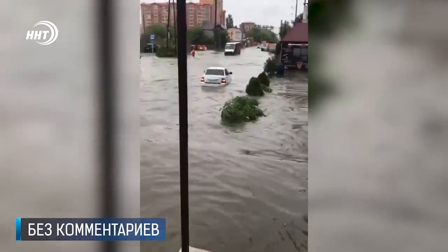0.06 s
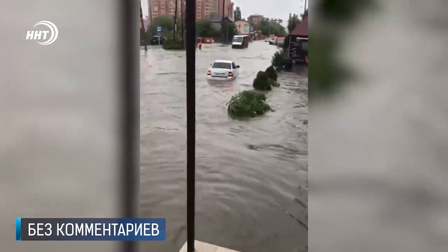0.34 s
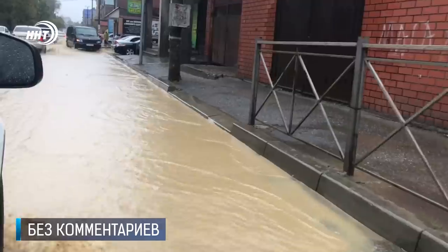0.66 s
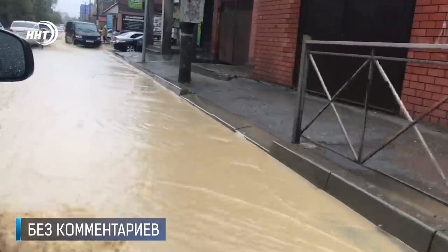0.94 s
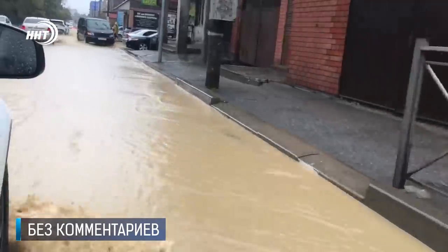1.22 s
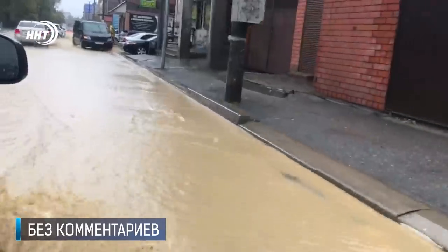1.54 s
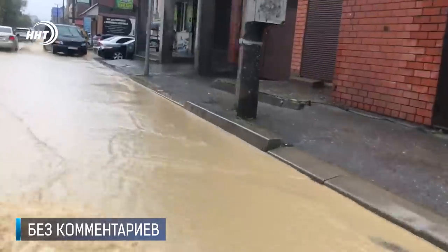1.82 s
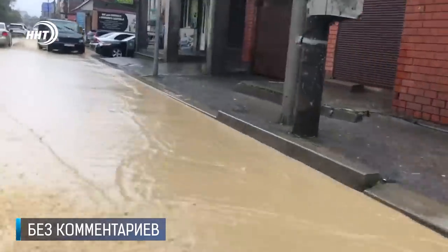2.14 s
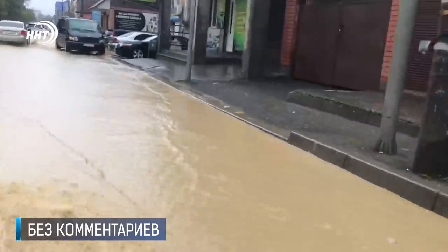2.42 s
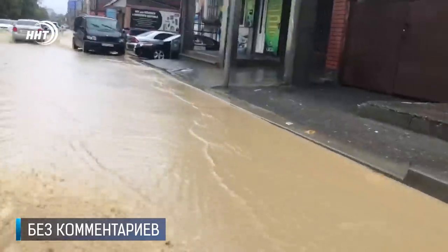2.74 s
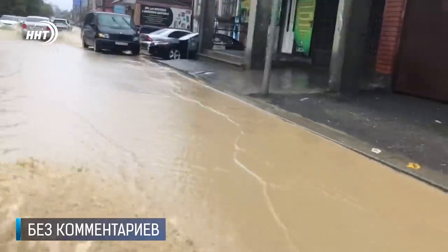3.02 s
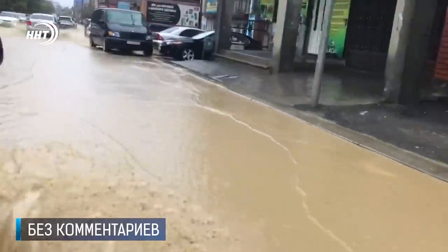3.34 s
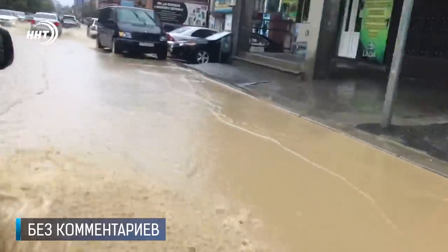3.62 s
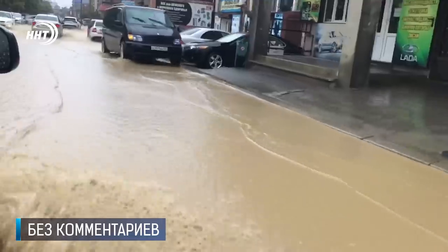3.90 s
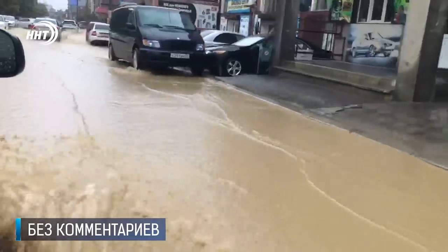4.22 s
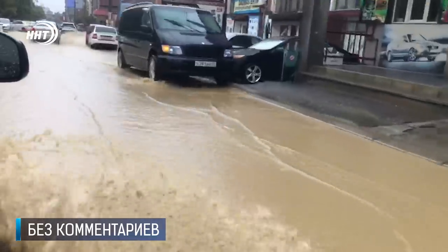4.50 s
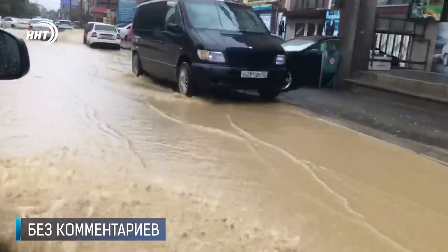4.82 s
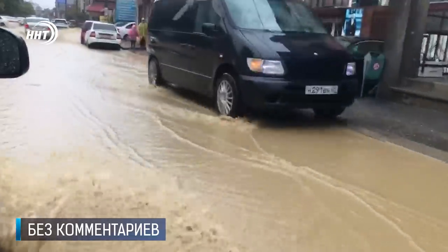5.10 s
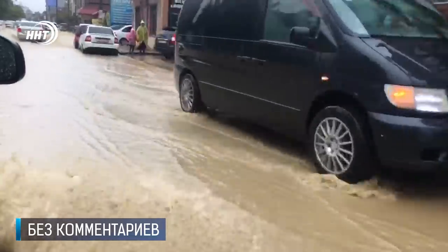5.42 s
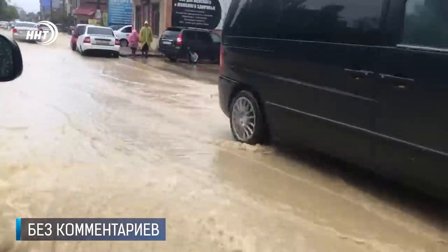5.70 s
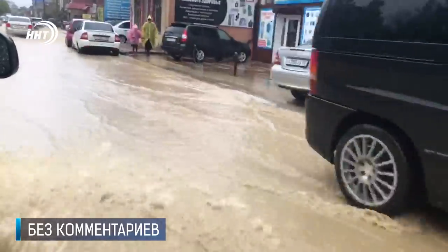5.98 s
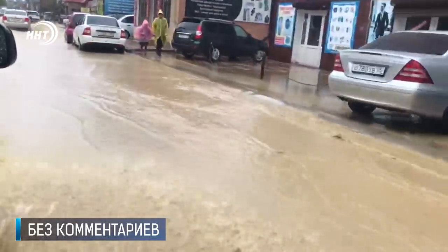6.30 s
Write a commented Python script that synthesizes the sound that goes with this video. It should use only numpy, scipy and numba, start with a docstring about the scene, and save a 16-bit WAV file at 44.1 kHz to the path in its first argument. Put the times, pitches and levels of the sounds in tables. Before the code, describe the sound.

A diesel idles briefly, then a car wades through a flooded street, water rushing, splashing and sloshing over a low engine drone.

```python
"""Two flooded streets, heard from inside vehicles, in mono, with a short silence between them.
First a diesel idles: its firings boom in the cab and shake a panel, while water washes far away.
Then, at the open window of a wading car, a second engine drones nearby, the car's own engine slowly
gains speed and water rumbles under the floor. Above it all the wheel churns up a rushing bow wave,
full of ringing bubbles and spray, that splashes, sloshes and slaps as it folds over."""
import sys
import numpy as np
from scipy import signal
from scipy.fft import rfft, irfft, next_fast_len
from scipy.io import wavfile
from numba import njit

SR = 44100
rng = np.random.default_rng(int(sys.argv[2]) if len(sys.argv) > 2 else 0)


def wrap_up_sound(samples):
    """Save the sound to the file named by the first command line argument, as 16-bit audio."""
    columns = np.atleast_2d(samples).T
    # keep every value between -1 and 1, then stretch to whole-number steps
    tamed = np.clip(columns, -1, 1)
    steps = np.round(tamed * 32767).astype(np.int16)
    wavfile.write(sys.argv[1], SR, steps)


N = 280035
TIME = np.arange(N) / SR
CAB_END_S, DRIVE_START_S = .658, .717


def undb(db):
    """Turn decibels (dB) into a number to multiply by."""
    return 10 ** (np.asarray(db) / 20)


def unit(x):
    """Scale a signal so that its average power is 1."""
    return x / np.sqrt(np.mean(x ** 2) + 1e-18)


def curve(table):
    """Join (time, value) points with straight lines."""
    return np.interp(TIME, *np.transpose(table))


def shape(x, gain_at):
    """Turn each frequency f up or down by gain_at(f)."""
    size = next_fast_len(len(x) + 2048)
    hz = np.maximum(np.fft.rfftfreq(size, 1 / SR), 1)
    return irfft(rfft(x, size) * gain_at(hz), size)[:len(x)]


def colour(x, points):
    """Set the balance of bass and treble from (Hz, dB) points; the result has power 1."""
    hz, db = np.transpose(points)
    return unit(shape(x, lambda f: undb(np.interp(np.log(f), np.log(hz), db))))


def resonance(x, hz, width_hz):
    """Keep mainly the frequencies near hz, as a ringing object does."""
    return unit(shape(x, lambda f: 1 / (1 + 1j * (f / hz - hz / f) * hz / width_hz) ** 2))


def noise():
    """White noise: an even hiss."""
    return rng.standard_normal(N)


def wander(rate):
    """A smooth random wobble of size about 1 that changes about rate times a second."""
    return unit(shape(noise(), lambda f: np.exp(-(f / rate) ** 2)))


def phase_of(hz):
    """The running angle, in radians, of a tone whose pitch moves."""
    return 2 * np.pi * np.cumsum(hz) / SR


def burst(start, length):
    """A loudness curve that swells quickly, lasts about length seconds and dies away."""
    age = np.clip((TIME - start) / length, 0, 10)
    return (1 - np.exp(-8 * age)) * np.exp(-age ** 2 / 2)


def hold(start, end, fade_s):
    """A loudness curve that fades in around start, holds, and fades out around end."""
    return (np.tanh(2 * (TIME - start) / fade_s) - np.tanh(2 * (TIME - end) / fade_s)) / 2


@njit
def ring(start, hz, cycles, size, glide):
    """Each bubble rings as a fading tone whose pitch rises as it nears the surface."""
    out = np.zeros(N)
    for k in range(len(start)):
        life = cycles[k] * SR / hz[k]  # samples it takes to fade to about a third
        first, phase = int(start[k] * SR), 0.
        for i in range(min(int(5 * life), N - first)):
            phase += 2 * np.pi * hz[k] / SR * (1 + glide * i / (5 * life))
            out[first + i] += size[k] * np.exp(-i / life) * np.sin(phase)
    return out


def bubbles(low_hz, high_hz, cycles, spread_db, glide, count):
    """A swarm of bubbles at random times, many faint and a few loud."""
    when, pitch, life, faintness = rng.random((count, 4)).T
    hz = low_hz * (high_hz / low_hz) ** pitch
    size = hz * undb(-spread_db * np.log(faintness + .01))  # "hz *" evens out low and high
    return unit(ring(when * N / SR, hz, cycles * (.5 + life), size, float(glide)))


def foam(flicker_db, flicker_rate, surge_db, surge_rate):
    """The hiss of countless tiny bursts: bands of pitch flicker alone and surge together."""
    edges_hz = np.append(0, 350 * 2 ** (np.arange(13) / 2))
    hiss = np.zeros(N)
    for low, high in zip(edges_hz, edges_hz[1:]):
        band = shape(noise(), lambda f: (f >= low) & (f < high))
        hiss += band * undb(flicker_db * wander(flicker_rate))
    return unit(hiss * undb(surge_db * wander(surge_rate)))


# Tone colour of the distant water: f/Hz, relative level/dB
FAR_FLOOD_COLOUR = [(20, -5), (100, 3), (300, -3), (450, -0.5), (1200, -2), (2100, -6.5), (3200, -10),
                    (4500, -12.5), (7000, -16.5), (11500, -23)]
def far_flood():
    """The flood washes softly, far from the cab."""
    wash = foam(flicker_db=1.5, flicker_rate=20, surge_db=.5, surge_rate=10)
    return undb(-32.5) * colour(wash, FAR_FLOOD_COLOUR)


# Tones of the diesel and its cab: multiple of the firing rate, relative level/dB
IDLE_TONES = [(1, -5), (1.5, -23), (2.001, 0), (3, -29), (4, -25), (5, -20), (5.75, -16.5), (5.999, -10.5),
              (6.7, -17.5)]
def idling_diesel(firing_hz=41.7):
    """The engine's firings boom in the cab and shake a panel."""
    phase = 2 * np.pi * firing_hz * TIME
    tones = np.zeros(N)
    for multiple, db in IDLE_TONES:
        gain = undb(db + .21 * wander(13))
        uneven = phase + .075 * wander(12)  # uneven firing unsettles high tones most
        tones += gain * np.cos(multiple * uneven + 2 * np.pi * rng.random())
    panel = resonance(noise() * (1 + .5 * np.cos(phase)), hz=260, width_hz=120)
    return undb(-21) * unit(tones) + undb(-42) * panel


# Firing rate of the second engine: t/s, f/Hz
SECOND_RATE = [(2.9, 67.5), (3.5, 61.5), (4.4, 61.3), (5.75, 67.3)]
# Its swells: start t/s, end t/s, level/dB
SECOND_SWELLS = [(3.08, 3.32, -35), (4.147, 4.705, -26.5), (5.1, 5.42, -22.5), (5.613, 5.742, -25)]
def second_engine():
    """A nearby exhaust drones in swells as its engine eases off and picks up again."""
    swells = sum(undb(db) * hold(start, end, fade_s=.078) for start, end, db in SECOND_SWELLS)
    return swells * np.sin(phase_of(curve(SECOND_RATE)) + .27 * wander(9.7))


# Moments when the wading car's exhaust booms: start t/s, end t/s, boost/dB
EXHAUST_BOOMS = [(1.85, 2.08, 7), (2.722, 3.24, 10), (5.88, 6.3, 4)]
# Its faint higher tones: multiple of the firing rate, level/dB
EXHAUST_OVERTONES = [(2.5, -45.5), (3, -45.5), (5, -50)]
START_HZ, CRUISE_HZ, PICKUP_S = 64.2, 88.5, 2.6  # firing rate: first, final, how slowly it rises
def exhaust(hz, phase):
    """The car's firings blend into a low note that grows louder as the engine speeds up."""
    firing_db = -28.5 + 30.5 * np.log2(hz / CRUISE_HZ)
    boom_db = sum(db * hold(start, end, fade_s=.08) for start, end, db in EXHAUST_BOOMS)
    overtones = sum(undb(db + 3.5 * wander(1)) * np.sin(k * phase) for k, db in EXHAUST_OVERTONES)
    return undb(firing_db + boom_db) * np.sin(phase) + overtones


def cabin_drone(hz, phase, cabin_hz=135.8, width_hz=8.5):
    """The air in the cabin rings when twice the firing rate passes its natural pitch."""
    mistuning = 2 * (2 * hz - cabin_hz) / width_hz
    return undb(-30) / (1 + mistuning ** 2) * np.sin(2 * phase)


def engines():
    """The car gains speed; two exhaust notes throb together, wavering as water covers the pipes."""
    hz = CRUISE_HZ - (CRUISE_HZ - START_HZ) * np.exp(-(TIME - DRIVE_START_S) / PICKUP_S)
    phase = phase_of(hz) + .1 * wander(8)
    pipes = exhaust(hz, phase) + second_engine()
    waver = undb(1.04 * wander(11))
    return np.sqrt(2) * (cabin_drone(hz, phase) + pipes * waver)  # sqrt(2) gives a sine power 1


# Tone colour of the rumble under the floor: f/Hz, relative level/dB
FLOOR_COLOUR = [(12, -50), (22, -24), (35, -16), (50, -4), (68, -3), (95, -4.5), (120, -8.5), (170, -14.5),
                (260, -45), (600, -64)]
# Loudness of that rumble: t/s, level/dB
FLOOR_LEVEL = [(.72, -32.5), (1.3, -30.5), (1.85, -27), (2.3, -31.5), (3.2, -27), (4.7, -27), (6.35, -28)]
# Heavy surges hitting the floor: t/s, peak level/dB
FLOOR_THUMPS = [(1.485, -25), (1.75, -21), (2.175, -18), (2.80, -16), (3.645, -15), (3.865, -13),
                (3.91, -17), (4.405, -20), (4.48, -13.5), (5.28, -17), (5.66, -15)]
def underbody(boom_hz=72):
    """The flood buffets the floor of the car; heavy surges make the body boom."""
    out = undb(curve(FLOOR_LEVEL) + wander(7)) * colour(noise(), FLOOR_COLOUR)
    for t, peak_db in FLOOR_THUMPS:
        swell = np.exp(-((TIME - t) / .014) ** 2)
        out += undb(peak_db) * swell * np.sin(2 * np.pi * (boom_hz * TIME + rng.random()))
    return out


# Tone colour of the churning: f/Hz, relative level/dB
CHURN_COLOUR = [(20, -55), (80, -17), (160, -3.5), (250, 0.5), (330, -4), (430, -9.5), (620, -6.5),
                (900, -12.5), (2000, -33), (6000, -60)]
def churn():
    """The wheel stirs in big pockets of air, which ring low."""
    pockets = bubbles(low_hz=131, high_hz=1192, cycles=2, spread_db=.5, glide=.093, count=3500)
    return colour(noise() + undb(-11.5) * pockets, CHURN_COLOUR)


# Tone colour of the rushing crest: f/Hz, relative level/dB
RUSH_COLOUR = [(40, -60), (300, -23), (600, -9.5), (850, -3.5), (1150, 0.5), (1600, -.5), (2100, -2),
               (2800, -3), (4000, -7.5), (6000, -9), (12000, -24)]
def rush():
    """The breaking crest froths and sheds bubbles; the free ones ring on as little plips."""
    crest = bubbles(low_hz=812, high_hz=4530, cycles=1.96, spread_db=3, glide=.11, count=7000)
    plips = bubbles(low_hz=1287, high_hz=4470, cycles=13, spread_db=3.2, glide=.1, count=900)
    froth = foam(flicker_db=1, flicker_rate=45, surge_db=.37, surge_rate=20)
    return colour(froth + undb(-8) * crest + undb(-14.5) * plips, RUSH_COLOUR)


# Tone colour of flying drops: f/Hz, relative level/dB
SPRAY_COLOUR = [(1200, -14.5), (3000, 0.5), (4500, 0.5), (6300, -0.5), (9000, -1.15), (11500, -3),
                (14000, -18)]
def spray():
    """Fine drops tick and fizz above the wave."""
    drops = bubbles(low_hz=2310, high_hz=11900, cycles=1.3, spread_db=1.5, glide=.13, count=16000)
    fizz = bubbles(low_hz=4007, high_hz=12080, cycles=35, spread_db=2.5, glide=.048, count=3000)
    mist = foam(flicker_db=.58, flicker_rate=20, surge_db=.84, surge_rate=7.2)
    return colour(mist + undb(-8.5) * drops + undb(-12.5) * fizz, SPRAY_COLOUR)


# Flung sheets of drops landing: t/s, relative level/dB, length/s
LANDING_SHEETS = [(2.642, -28.5, 0.032), (2.952, -28, 0.036), (3.14, -28, 0.016), (3.581, -27, 0.059),
                  (3.848, -27, .025), (4.188, -24, 0.042), (4.268, -27.5, 0.0082), (4.463, -26, .012),
                  (4.822, -29, .03), (6.106, -28, 0.047)]
def splashes():
    """Sheets of drops patter back onto the water."""
    drops = bubbles(low_hz=2020, high_hz=12600, cycles=1.5, spread_db=.5, glide=.1, count=30000)
    landings = sum(undb(db + 5) * burst(t, length) for t, db, length in LANDING_SHEETS)
    return colour(drops, SPRAY_COLOUR) * landings


# Sloshes that fall in pitch: t/s, first f/Hz, last f/Hz, typical bubble level/dB, length/s
FALLING_SLOSHES = [(3.592, 5500, 1400, -24, 0.036), (3.851, 6800, 1500, -26, 0.042),
                   (6.066, 3200, 1500, -22, .07)]
def sloshes(count=36, scatter_octaves=.34):
    """A tongue of water collapses into ever bigger, and so deeper, bubbles."""
    out = np.zeros(N)
    for t, first_hz, last_hz, db, length in FALLING_SLOSHES:
        late, size, scatter = rng.random((count, 3)).T
        hz = first_hz * (last_hz / first_hz) ** late
        hz *= 2 ** (scatter_octaves * (2 * scatter - 1))
        out += ring(t + length * late, hz, np.full(count, 3.), undb(db) * (.5 + size), glide=.091)
    return out


# The wave folds over and traps air: t/s, f/Hz, level/dB, gurgle length/s
WAVE_FOLDS = [(.8553, 1420, -15, .028), (1.1522, 1340, -14, .02), (1.2752, 1160, -12, .03),
              (1.4214, 1340, -6, .002), (1.503, 1130, -9, .025), (1.6836, 2430, -12, .01),
              (1.8519, 1220, -11, .035), (1.9365, 2330, -12, .012), (2.1433, 1490, -12, .008),
              (2.6639, 2950, -13, .01), (2.788, 1340, -13, .015), (3.1234, 2800, -7.5, .012),
              (4.2371, 1180, -13, .02), (4.310, 1250, -13, .025), (6.338, 1660, -9, .012)]
def slaps(gurgle_db=-5.5, bubbles_per_s=350):
    """Each fold closes with a sharp smack, then gurgles with bubbles of about the same pitch."""
    out = np.zeros(N)
    for t, hz, db, length in WAVE_FOLDS:
        smack = ring(np.array([t], float), np.array([hz], float), np.array([1.3]), undb([db]), glide=.1)
        count = 1 + int(bubbles_per_s * length)
        delay, pitch, size = rng.random((count, 3)).T
        bubble_hz = hz * 1.2 ** (2 * pitch - 1)
        gains = undb(db + gurgle_db) * size
        gurgle = ring(t + length * delay, bubble_hz, np.full(count, 3.), gains, glide=.2)
        out += smack + gurgle
    return out


# Strength of the bow wave, given as the loudness of its spray: t/s, level/dB
SPRAY_LEVEL = [(.72, -31), (1.1, -28.5), (1.4, -28.5), (1.55, -26.5), (1.9, -26.5), (2.6, -25),
               (3.1, -25.5), (4.8, -23.3), (5.45, -25.5), (6.0, -23), (6.35, -24.5)]
def bow_wave(full_wave_db=-24):
    """The wave pushed up by the wheel swells and sinks; churn and rush change less than the spray."""
    spray_db = curve(SPRAY_LEVEL)
    churn_db = -30.5 + .29 * (spray_db - full_wave_db)
    rush_db = -24.5 + .41 * (spray_db - full_wave_db)
    return undb(churn_db) * churn() + undb(rush_db) * rush() + undb(spray_db) * spray()


def scene():
    """The cab, a moment of silence, then the drive; the same in both ears."""
    drive = engines() + underbody() + bow_wave() + slaps() + splashes() + sloshes()
    cab = idling_diesel() + far_flood()
    in_cab = np.clip((CAB_END_S - TIME) / .002, 0, 1)
    in_car = np.clip((TIME - DRIVE_START_S) / .001, 0, 1)
    return np.tile(in_cab * cab + in_car * drive, (2, 1))


# Narrow dips in the treble: f/Hz, width/Hz, level change/dB
TREBLE_DIPS = [(4890, 220, -3), (7730, 430, -2.5), (10420, 280, -3)]
TOP_HZ = 11720
def record(dry):
    """Three narrow dips colour the treble, and everything above TOP_HZ is cut steeply."""
    def dips(f):
        return undb(sum(db * np.exp(-((f - hz) / width) ** 2) for hz, width, db in TREBLE_DIPS))
    coloured = np.array([shape(channel, dips) for channel in dry])
    treble_cut = signal.ellip(12, .2, 80, TOP_HZ, fs=SR, output="sos")
    return signal.sosfilt(treble_cut, coloured)


dry = scene()
out = record(dry)
wrap_up_sound(out)
```